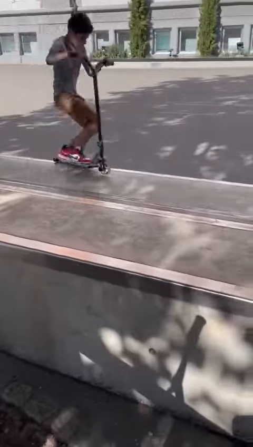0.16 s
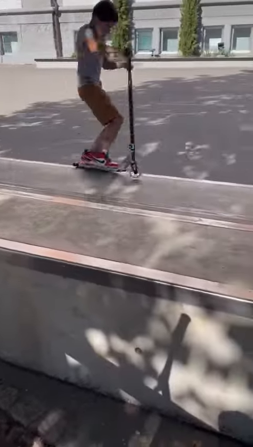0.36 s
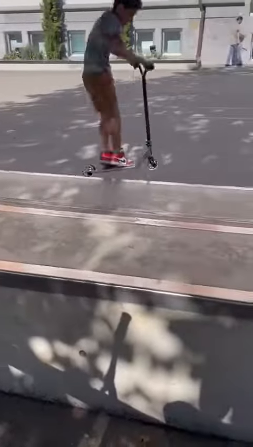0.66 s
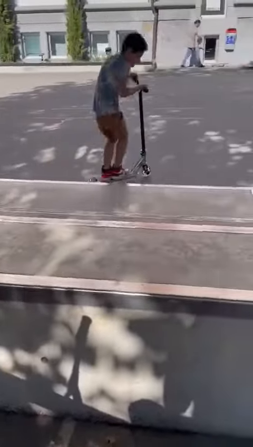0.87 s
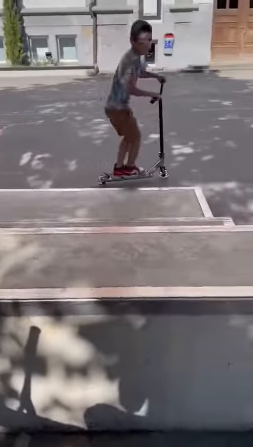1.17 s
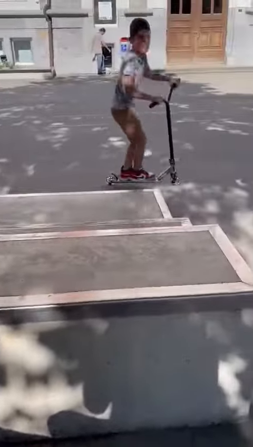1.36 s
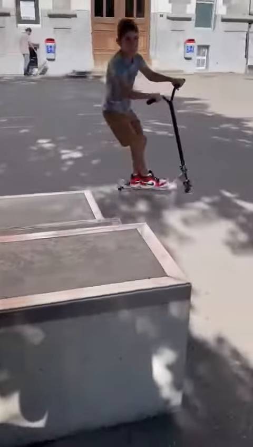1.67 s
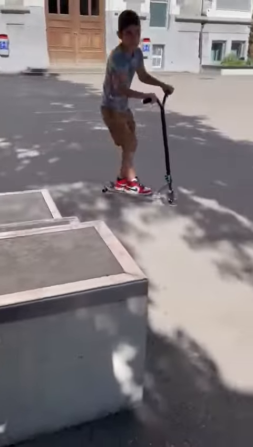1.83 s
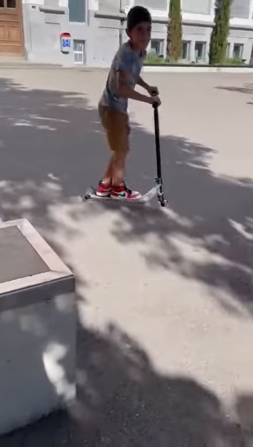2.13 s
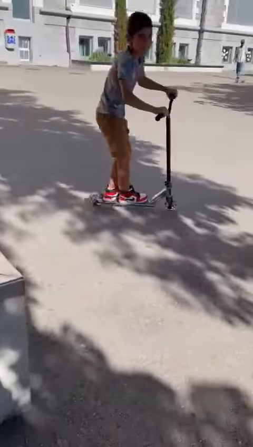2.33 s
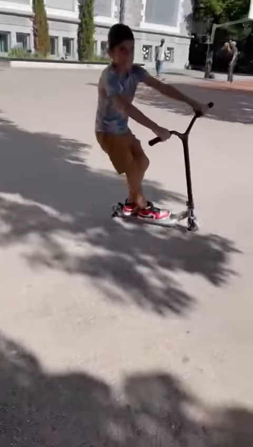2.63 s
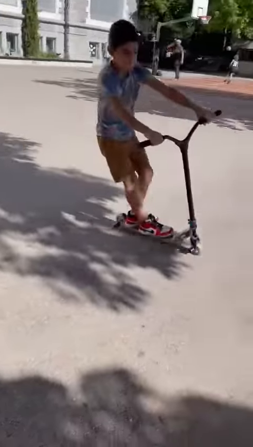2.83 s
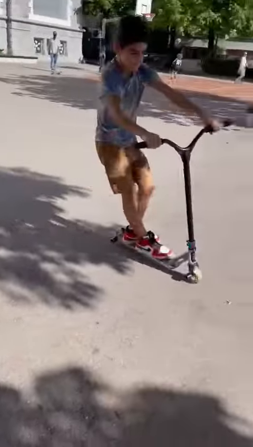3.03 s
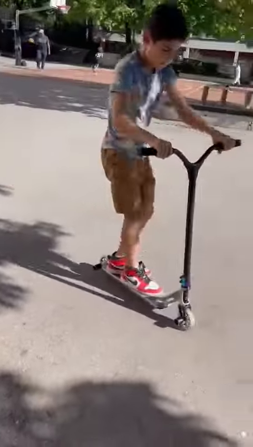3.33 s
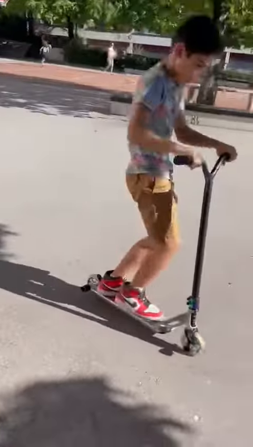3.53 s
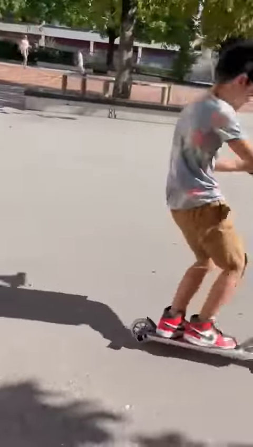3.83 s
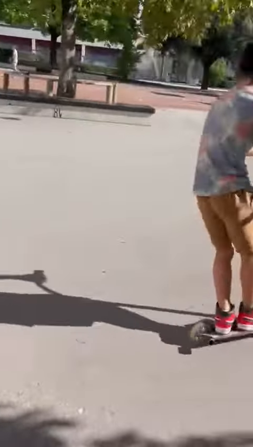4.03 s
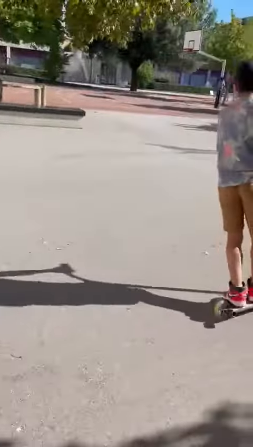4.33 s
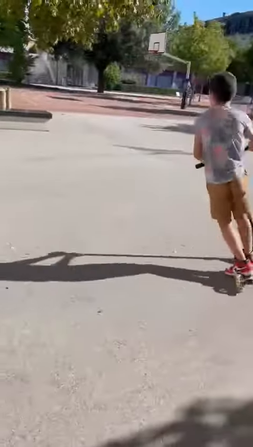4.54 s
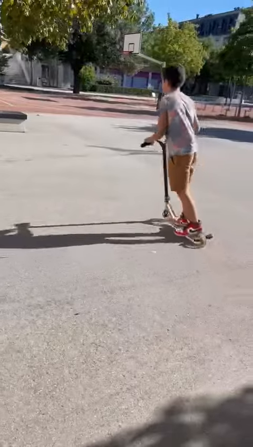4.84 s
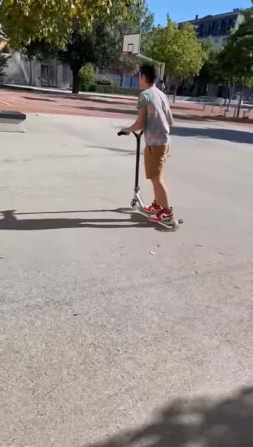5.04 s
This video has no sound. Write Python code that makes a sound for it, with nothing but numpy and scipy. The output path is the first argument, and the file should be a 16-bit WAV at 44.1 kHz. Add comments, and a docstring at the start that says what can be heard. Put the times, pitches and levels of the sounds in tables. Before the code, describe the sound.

A stunt scooter hits a ledge with a sharp metal clack and grinds along it with a brief squeal. It lands, then drops to the concrete with a rattle. The hard wheels rumble and hum from far right to close left, where the scooter slams down loudly and rolls on. Dull footsteps, scuffs and cracking grit sound beside the microphone in an open yard.

```python
"""A sharp metal clack: a stunt scooter hits a skatepark ledge and grinds along it with a short squeal.
It lands, drops to the concrete, rolls from far right to close left and slams down once more.
Deck and stem ring at every blow, and a facade answers while the scooter is far off. The hard wheels
rumble and hum. Someone walks beside the listener: dull heel-and-toe footfalls, scuffing soles and
grit that cracks underfoot."""
import sys
import numpy as np
from scipy import signal
from scipy.fft import rfft, irfft, next_fast_len
from scipy.io import wavfile
from scipy.ndimage import uniform_filter1d, map_coordinates

SR = 44100
rng = np.random.default_rng(int(sys.argv[2]) if len(sys.argv) > 2 else 0)


def output_pcm(signal):
    """Save a mono or channel-first signal as 16-bit PCM at the path in sys.argv[1].

    Samples are clipped to [-1, 1] before scaling.
    """
    pcm = np.clip(np.atleast_2d(signal).T, -1, 1) * 32767
    wavfile.write(sys.argv[1], SR, np.round(pcm).astype(np.int16))


N = 229128
TIME = np.arange(N) / SR
SIDES = np.array([[.5], [-.5]])  # splits a level or phase offset between left and right


def amp(db):
    """Decibels to gain."""
    return 10 ** (np.asarray(db) / 20)


def unit(x):
    """Scale to rms 1."""
    return x / np.sqrt(np.mean(x ** 2) + 1e-20)


def along(points, hz):
    """Read a curve of (Hz, value) points on a log frequency axis."""
    freqs, values = np.transpose(points)
    return np.interp(np.log(hz + 1), np.log(freqs + 1), values)


def curves(rows):
    """Automation lanes: one value per sample for each column after the time."""
    times, *columns = np.transpose(rows)
    return [np.interp(TIME, times, column) for column in columns]


def wobble(rate):
    """A smooth random curve, rate knots a second."""
    knots = rng.standard_normal(int(N * rate / SR) + 4)
    grid = np.arange(0, len(knots) - 1, 1 / 10)
    return np.interp(TIME * rate, grid, map_coordinates(knots, [grid]))


def swell(peak_s, rise_s, fall_s):
    """An envelope that grows exponentially to its peak and dies away after it."""
    return np.exp(np.minimum((TIME - peak_s) / rise_s, (peak_s - TIME) / fall_s))


def filtered(x, response):
    """EQ x with a complex response of frequency."""
    n = x.shape[-1]
    padded = next_fast_len(n + SR // 4)
    return irfft(rfft(x, padded) * response(np.fft.rfftfreq(padded, 1 / SR)), padded)[..., :n]


def noise(spectrum, shape):
    """Coloured noise of rms 1."""
    return unit(filtered(rng.standard_normal(shape), lambda hz: amp(along(spectrum, hz))))


def fading(spectrum, t, t60):
    """A dying burst of coloured noise, with the energy of its envelope."""
    envelope = amp(-60 * t / t60)
    burst = noise(spectrum, len(t)) * envelope
    return burst * np.linalg.norm(envelope) / np.linalg.norm(burst)


def fuzzy_tone(hz, width):
    """A narrow band of noise, rms 1, that follows a pitch curve."""
    phase = 2 * np.pi * np.cumsum(hz) / SR
    return unit(wobble(width) * np.sin(phase) + wobble(width) * np.cos(phase))


def add(track, start_s, x):
    """Mix x into the track from start_s on."""
    i = max(round(start_s * SR), 0)
    track[..., i:i + x.shape[-1]] += x[..., :N - i]


def ring(modes, t, damping):
    """Damped modes, struck at new strengths every time; damping multiplies their widths."""
    hz, width, db = np.transpose(modes)[:, :, None]
    strength = amp(db + rng.normal(0, 0.73, hz.shape))
    decay = np.exp(-np.pi * width * damping * t)
    waves = np.sin(2 * np.pi * (hz * t + rng.random(hz.shape)))
    return (strength * decay * waves).sum(0) / np.linalg.norm(strength)


def focused(modes, centre_hz, loss_db):
    """The struck spot favours modes near centre_hz; those an octave away lose loss_db."""
    return [(hz, width, db - loss_db * np.log2(hz / centre_hz) ** 2) for hz, width, db in modes]


# Modes of the deck's hollow body, of its clack and of the stem.
# Each row: frequency in Hz, base width in Hz, relative level in dB.
BOOM_MODES = [(198, 20, 1.5), (277.2, 15, 6), (340, 25, -2.5), (397, 28, -3), (461, 24, -0.5),
              (507, 35, -4), (543, 19, -3), (591, 20, 2), (631, 19.6, 0.5), (693, 20.6, 3.5)]
CLACK_MODES = [(822, 27, 3.5), (917, 30, 0), (1016, 35, 0), (1068, 34, -2), (1097, 24, 0.5),
               (1166, 24, 1.5), (1220, 27, 0), (1300, 20, 1), (1335, 32, -1.5), (1422, 27, 0),
               (1507, 23, 0.5), (1643, 27, 0)]
STEM_MODES = [(1735, 25, 0), (1935, 21, 1.5), (2226, 28, 5), (2320, 22, 11), (2384, 29, 2.5),
              (2640, 29, -8), (2660, 32, 4), (2910, 29, -4.5), (3010, 35, 1), (3310, 41, 3),
              (3620, 49, -11), (5000, 53, -18), (6830, 23, -3)]
# Noise colours of the low knock, the mid clack (also heel taps and slaps) and the bright crack.
# Each row: frequency in Hz, relative level in dB.
KNOCK_EQ = [(45, -13), (75, 1), (130, -9.5), (270, -3.5), (380, -12.5), (700, -65), (2000, -77)]
CLACK_EQ = [(120, -45), (400, 5), (620, 2), (820, 2.5), (1170, 5.5), (1500, -1), (2000, 0.5), (3000, -16.5),
            (5000, -17), (12000, -21)]
CRACK_EQ = [(600, -52), (1800, 4), (3100, 0.5), (4300, 0), (6500, -4), (8000, 0), (11000, -2.5)]
# The scooter's hits, plus a faint bright tick at 0.102 s echoing off the facade.
# Each row: start in seconds, level in dB, knock and boom trims in dB,
# boom and clack centres in Hz, stem and crack trims in dB, ring length as a factor.
BLOW_CUES = [(0.0, -12.5, -11.5, -14, 520, 1170, -15, -12, 0.53),
             (0.0155, -10.5, -21, -15.5, 502, 1210, -6, 1, 0.52),
             (0.102, -39, -24, -22, 500, 1200, -4, 7, .9), (0.324, -28, 1, -2.5, 271, 1010, -12, -20, 1.8),
             (0.463, -25.5, -17, -22, 496, 965, -2, -15, 0.55),
             (0.4806, -18.5, -11, -18, 700, 960, -4.5, -23, 0.42),
             (0.497, -21, -14, -24, 700, 920, -16, -35, 1.7), (0.742, -29, -4, -6, 400, 1100, -7, -5, 1.2),
             (0.751, -15, -9, -9, 750, 1090, -1.5, -7.5, 0.66),
             (0.754, -22.5, -4, 4.5, 374, 1000, -12, -12, 0.43),
             (0.7617, -17.5, -3.5, -10, 600, 1210, -2.5, -5.5, 0.68),
             (1.692, -21.5, -21, -5, 292, 910, -10, -11.5, 0.87),
             (1.704, -23.5, -24, -7, 525, 957, -16.5, -12.5, 1.46),
             (1.8458, -23, -13, -1, 287, 880, -15, -17, 1.15),
             (1.856, -25.5, -8, -0.5, 317, 890, -22, -22, 1),
             (1.861, -30.5, -23, -3, 610, 950, -20, -20, 1.3),
             (1.931, -23.5, -8.5, -4, 650, 970, -20, -21, 0.76),
             (2.011, -26, -4.5, -3.5, 550, 1090, -8, -14, 0.67),
             (2.022, -29.5, -9, -6, 400, 1150, -9, -19, 0.9),
             (3.6102, -23.5, -23, -23, 600, 1248, -7, -4.5, .3),
             (3.6123, -11.5, -34, -12.5, 560, 1140, -25, -18, 0.92),
             (3.623, -10, -30, -10, 290, 1220, -17, -16, 0.87),
             (3.634, -8, -28, -13, 280, 1230, -16.5, -14.5, 0.83),
             (3.646, -16, -25, -5.5, 480, 1190, -26, -16, 1.3),
             (3.675, -22, -12, 3, 590, 1140, -23, -11, 0.93),
             (3.843, -26.5, -8, -10, 400, 1250, -16, -26, 2.5),
             (3.95, -25, -18, -23, 499, 1530, -15.5, -13.5, 1.07),
             (4.12, -28, -14, 1, 651, 993, -29, -30, 0.56), (4.686, -32, 4, 3, 300, 1330, -8, -9, 0.91)]


def blows():
    """Each cue layers a knock, the struck spot's boom and clack, a stem ring and a crack."""
    track, t = np.zeros(N), np.arange(SR // 4) / SR
    # the heavy deck takes longer to get moving than the thin stem
    slow_attack, fast_attack = 1 - np.exp(-t / .0018), 1 - np.exp(-t / .0005)
    for start, db, knock_db, boom_db, boom_hz, clack_hz, stem_db, crack_db, length in BLOW_CUES:
        rattle_t60 = 0.083 * length  # loose parts buzz on after the contact
        boom = ring(focused(BOOM_MODES, boom_hz, loss_db=10.5), t, damping=1 / length)
        knock = fading(KNOCK_EQ, t, t60=0.094)
        rattle = amp(-5.5) * fading(CLACK_EQ, t, rattle_t60)
        clack = amp(1.5) * ring(focused(CLACK_MODES, clack_hz, loss_db=42), t, damping=1.06 / length)
        stem = ring(STEM_MODES, t, damping=1.33 / length)
        sizzle = amp(-2) * fading(CRACK_EQ, t, rattle_t60) * fast_attack
        contact = amp(2.5) * fading(CRACK_EQ, t, t60=.008)
        body = (amp(knock_db) * knock + amp(boom_db) * boom) * slow_attack
        metal = (amp(-10.5) * (rattle + clack) + amp(stem_db) * stem) * fast_attack
        crack = amp(crack_db) * (sizzle + contact)
        add(track, start, amp(db) * (body + metal + crack))
    return track


# Colour of grit rubbed on concrete, under deck, wheel or shoe.
# Each row: frequency in Hz, relative level in dB.
GRIT_EQ = [(100, 1), (600, 2.5), (1400, 0.5), (2500, -6.5), (4000, -6), (6500, -8.5), (9000, -2),
           (11000, -8)]


def grains(per_s, range_db):
    """Grit ticks at random times and strengths, rms 1 overall."""
    track, t = np.zeros(N), np.arange(SR // 40) / SR
    draws = rng.random((int(per_s * N / SR), 2))
    ticks = noise(GRIT_EQ, len(draws) * len(t)).reshape(-1, len(t)) * amp(-60 * t / 0.015)
    for (when, size), tick in zip(draws, ticks):
        add(track, when * TIME[-1], amp(range_db * size) * tick)
    return unit(track)


# Colours of the ledge's scrape and of concrete hiss (also under the wheels).
# Each row: frequency in Hz, relative level in dB.
SCRAPE_EQ = [(180, -35), (500, -21), (800, 2.5), (1400, -2.5), (2200, 0), (3300, 0), (4500, -9), (6500, -5),
             (8000, -20), (11000, -6.5)]
HISS_EQ = [(1500, -6.5), (3000, 4.5), (4200, 0.5), (6500, -3.5), (8000, -7.5), (11000, -9.5)]
# The slide along the ledge. Each row: time in seconds, level in dB, pitch of the singing edge in Hz.
GRIND_CURVE = [(0, -25, 2290), (.06, -46, 2200), (.13, -43, 1980), (.2, -44, 2250), (.28, -41.5, 2550),
               (.33, -45, 2850), (.45, -42.5, 2300), (.5, -40, 2157), (.56, -54, 1923), (.72, -63, 1924)]


def grind():
    """The deck judders over the rough ledge and chips grit off it, while the edge sings."""
    db, hz = curves(GRIND_CURVE)
    chips = amp(-3.5) * grains(per_s=220, range_db=14)
    scrape = noise(SCRAPE_EQ, N)
    edge = amp(-3.5) * fuzzy_tone(hz, width=240)
    hiss = amp(1.5) * noise(HISS_EQ, N)
    judder = amp(2.5 * wobble(250) + 1.2 * wobble(45))
    on_ledge = TIME < 0.69
    return on_ledge * amp(db) * unit((scrape + edge + hiss + chips) * judder)


# The fader that drives wheel noise and sand. Each row: time in seconds, level in dB.
ROLL_CURVE = [(0.7, -50.5), (1.02, -52.5), (1.37, -53), (1.94, -46), (2.13, -49), (2.4, -52), (2.8, -46),
              (3.45, -53), (3.65, -48.5), (3.78, -40.5), (3.94, -42), (4.15, -45), (4.97, -45), (5.2, -44)]


def roll_level():
    """How loudly the wheels run, in dB; they barely touch at first."""
    db, = curves(ROLL_CURVE)
    lifted_db, wheels_down_s = -18, 0.3
    return db + lifted_db * np.clip(2 * (1 - TIME / wheels_down_s), 0, 1)


def patchy(x, depth_db):
    """Narrow bands of x swell and fade on their own."""
    bands = signal.stft(x, nperseg=1024)[2]
    drift = uniform_filter1d(rng.standard_normal(bands.shape[1:]), size=3, axis=0)  # across pitch
    drift = uniform_filter1d(drift, size=11, axis=1)  # across time
    return unit(signal.istft(bands * amp(depth_db * unit(drift)), nperseg=1024)[1][:, :N])


# Colours of the wheels' low rumble and mid roar. Each row: frequency in Hz, relative level in dB.
RUMBLE_EQ = [(20, -28), (35, -8), (58, 4.5), (100, -0.5), (145, 1.5), (220, -6), (350, -13.5), (700, -56)]
ROAR_EQ = [(150, -13.5), (350, 7), (620, 0.5), (900, -3), (1400, -7.5), (2300, -9), (3300, -22.5),
           (6000, -58)]


def rolling():
    """Hard wheels on concrete: bumps swell rumble and roar, the surface grain roughens roar and hiss."""
    db = roll_level()
    push_db = db + 47.5  # level above an easy roll
    bumps_db, grain_db, swells_db = 2 * wobble(28), wobble(400), .9 * wobble(8)
    rumble = amp(-43 + 0.43 * push_db + bumps_db) * noise(RUMBLE_EQ, (2, N))
    roar = patchy(noise(ROAR_EQ, (2, N)), depth_db=3.5)
    roar *= amp(db + 0.5 + .5 * bumps_db + 0.7 * grain_db)
    hiss = amp(-51.5 + 0.5 * push_db + swells_db + grain_db) * noise(HISS_EQ, (2, N))
    return rumble + roar + hiss


def sand():
    """Loose grains tick as the wheels crush them."""
    return amp(roll_level() - 11) * grains(per_s=45, range_db=8)


# The wheels' hollow note. Each row: time in seconds, pitch in Hz, level in dB before the trim.
HUM_CURVE = [(0.7, 644, -60), (1.3, 636, -59), (1.46, 675, -55), (1.6, 742, -48.5), (1.7, 709, -53),
             (1.9, 666.3, -62), (2.2, 594, -62), (2.62, 670, -53.5), (2.8, 699, -46.5), (3.52, 586, -67),
             (3.75, 606, -50), (4.04, 581, -48.5), (4.11, 610, -35), (4.21, 618, -49), (4.89, 609, -59),
             (5.2, 598, -47)]


def wheel_hum():
    """The turning wheels hum with a hollow, unsteady note."""
    hz, db = curves(HUM_CURVE)
    gain = amp(db - 1 + 1.5 * wobble(9))
    return gain * np.array([fuzzy_tone(hz, width=150), fuzzy_tone(hz, width=150)])


def squeal():
    """Metal sticks and slips on the ledge: a rough tone and a low groan catch, hold and die away."""
    start_s, attack_s, hold_s, fall_db_per_s, pitch_hz = 0.321, 0.0024, 0.013, 703, 3375
    t = TIME - start_s
    envelope = np.clip(t / attack_s, 0, 1) * amp(-fall_db_per_s * np.maximum(t - hold_s, 0))
    phase = 2 * np.pi * np.cumsum(pitch_hz * (1 + .024 * wobble(800))) / SR
    tone = np.sin(phase) + amp(-8) * np.sin(2 * phase) + amp(-20) * np.sin(3 * phase)
    rough_gain = amp(-20 + 1.9 * wobble(303.3))
    groan = amp(-18.5) * fuzzy_tone(np.full(N, 920.), width=260)
    return envelope * rough_gain * (tone + groan)


# Colour of a footfall's dull body. Each row: frequency in Hz, relative level in dB.
THUD_EQ = [(50, -3), (130, 1), (400, 1.5), (600, -27), (1500, -49)]


def thud(base_hz, swell_s):
    """A thud swells and sinks in pitch as the sole flattens, with a soft slap on top."""
    t = np.arange(SR // 6) / SR
    progress = t / swell_s
    pitch = base_hz * (0.6 + 1.993 * np.exp(-progress / 0.67))
    pressure = (progress * np.exp(1 - progress)) ** 2.63
    push = pressure * np.sin(2 * np.pi * np.cumsum(pitch) / SR)
    body = amp(-10) * noise(THUD_EQ, len(t)) * amp(-60 * t / .11) * (1 - np.exp(-progress))
    slap = amp(-25) * noise(CLACK_EQ, len(t)) * amp(-60 * t / 0.14) * (1 - np.exp(-10 * progress))
    return push + body + slap


# The walker's steps. Each row: start in seconds, heel level in dB, base pitch in Hz, heel swell and
# forefoot lag in seconds, forefoot and tap levels in dB relative to the heel.
STEP_CUES = [(0.484, -15.5, 166, .0078, 0.022, -7.5, -20), (0.627, -24.5, 134, .01, 0.043, -13.5, -32),
             (1.895, -19.5, 143, 0.009, .034, -8.5, -17), (2.521, -17.5, 126, 0.012, .035, -2.5, -18),
             (3.088, -16, 148.7, 0.0081, .031, -9.5, -32), (3.817, -21, 127, 0.0087, .036, -0.5, -13),
             (4.075, -15, 158.6, 0.0079, .043, -18, -19), (4.691, -19.5, 170, 0.0067, .032, -4, -16),
             (5.092, -19, 150, 0.0073, .04, -24, -22)]


def footfalls():
    """The heel lands, its edge taps just after, and the forefoot follows with a lower thud."""
    track, t = np.zeros(N), np.arange(SR // 20) / SR
    for start, db, hz, swell_s, lag_s, toe_db, tap_db in STEP_CUES:
        add(track, start, amp(db) * thud(hz, swell_s))
        add(track, start + .0015, amp(db + tap_db) * fading(CLACK_EQ, t, t60=0.012))
        add(track, start + lag_s, amp(db + toe_db) * thud(hz * 0.748, swell_s=0.011))
    return track


# Colour of a grain snapping. Each row: frequency in Hz, relative level in dB.
SNAP_EQ = [(800, -22), (4000, -8), (7000, 0), (10000, 6), (11500, -0.5)]
# Grit underfoot. Each row: start in seconds, snap level in dB, crunch level in dB.
GRIT_CUES = [(1.8633, -25.5, -36.5), (2.6702, -22.5, -30), (2.7129, -24, -34.5), (3.9498, -30, -43),
             (4.377, -47, -37.5), (4.947, -25.5, -27), (5.0992, -30.5, -37)]


def grit_cracks():
    """Single grains crack under a sole: a sharp snap and a duller, longer crunch."""
    track, t = np.zeros(N), np.arange(SR // 8) / SR
    for start, snap_db, crunch_db in GRIT_CUES:
        crunch = fading(GRIT_EQ, t, t60=0.027) + amp(-11.5) * fading(GRIT_EQ, t, t60=0.2)
        snap = fading(SNAP_EQ, t, t60=.008)
        add(track, start, amp(snap_db) * snap + amp(crunch_db) * crunch)
    return track


# Dragging soles. Each row: peak time in seconds, level in dB, rise and fall in seconds.
SCUFF_CUES = [(1.996, -34, 0.021, 0.043), (2.121, -40.5, 0.0055, 0.016), (2.74, -38, 0.037, 0.059),
              (3.85, -43, 0.017, .03), (4.06, -36.5, 0.0091, 0.024), (4.952, -38, 0.0046, 0.051)]


def scuffs():
    """Shoes drag over the concrete in short, grainy swells."""
    drag = sum(amp(db) * swell(peak, rise, fall) for peak, db, rise, fall in SCUFF_CUES)
    return drag * unit(noise(GRIT_EQ, N) * amp(2.8 * wobble(900)))


# Modes of the thin steel fender. Each row: frequency in Hz, base width in Hz, relative level in dB.
FENDER_MODES = [(3220, 35, -2.5), (3600, 32, -6), (4060, 40, -1), (4550, 38, -3), (5350, 40, -2),
                (5860, 31, -1), (6840, 94, 3), (7800, 71, 9), (10100, 130, 6), (10900, 90, 2)]


def fender_buzz():
    """After the drop the brake fender chatters against the wheel and keeps ringing."""
    t = np.arange(SR // 5) / SR
    envelope = swell(peak_s=1.992, rise_s=0.018, fall_s=.028)
    taps = envelope * rng.standard_normal(N) * amp(5 * wobble(300))
    buzz = signal.oaconvolve(taps, ring(FENDER_MODES, t, damping=1.35))[:N]
    return amp(-35.5) * buzz * np.linalg.norm(envelope) / np.linalg.norm(buzz)


def placed(x, pan_db):
    """Pan x, mainly around 1 kHz; positive is left."""
    return filtered(x, lambda hz: amp(SIDES * pan_db * np.exp(-np.log2((hz + 1) / 1050) ** 2)))


def reflected(x, response):
    """Send x through a two-channel impulse response scaled to energy 1 in its first channel."""
    return signal.oaconvolve(x[None], response / np.linalg.norm(response[0]), axes=1)[:, :N]


def bounce(x, delay_s, t60):
    """A surface scatters x back as two unrelated signals."""
    t = np.arange(SR // 4) / SR
    envelope = (t >= delay_s) * amp(-60 * np.abs(t - delay_s) / t60)
    return reflected(x, rng.standard_normal((2, len(t))) * envelope)


# Tone of the facade's echo. Each row: frequency in Hz, gain in dB.
FACADE_EQ = [(300, -21), (1000, -14.5), (2300, -23), (5000, -18.5), (11000, -34)]


def facade_echo(x):
    """The facade throws back a late, coloured slap."""
    return filtered(bounce(x, delay_s=.084, t60=0.047), lambda hz: amp(along(FACADE_EQ, hz)))


# The yard's reverb. Each row: frequency in Hz, time to fall 60 dB in seconds.
YARD_DECAY = [(100, 0.41), (400, 0.52), (1300, 0.69), (4000, 0.43), (11000, 0.38)]


def yard_tail(x):
    """The thin tail of the open yard; each frequency dies at its own speed."""
    hz, t, bands = signal.stft(rng.standard_normal((2, SR * 3 // 4)), SR, nperseg=256)
    decay = amp(-60 * t / along(YARD_DECAY, hz)[:, None])
    return reflected(x, signal.istft(bands * decay, SR, nperseg=256)[1])


# How alike left and right are in diffuse sound. Each row: frequency in Hz, coherence (1 is mono).
COHERENCE = [(130, 1), (300, 0.99), (600, 0.21), (1000, 0.13), (1800, 0.83), (3000, 0.052), (4200, 0.05),
             (4900, 0.97), (6100, 1), (7400, 1), (8600, 1), (9600, 1), (11000, 1)]


def diffuse(pair):
    """Two unrelated signals become a stereo field that is mono in the bass and the high treble."""
    def mid_side_gains(hz):
        angle = np.arccos(np.clip(along(COHERENCE, hz), -1, 1)) / 2
        return np.array([np.cos(angle), np.sin(angle)])
    mid, side = filtered(pair, mid_side_gains)
    return np.array([mid + side, mid - side])


def scene():
    """The scooter starts to the right, where the facade echoes it, then passes close on the left."""
    scooter = blows() + fender_buzz() + grind() + sand()
    shriek = squeal()
    feet = footfalls() + scuffs() + grit_cracks()
    passed = np.interp(TIME, (2.2, 3.0), [0, 1])  # crossfade from far right to near left
    far, near = scooter * (1 - passed), scooter * passed
    direct = placed(far + shriek, pan_db=-7.5) + placed(near, pan_db=13) + placed(feet, pan_db=6)
    ground = amp(-5) * bounce(scooter, delay_s=0.00082, t60=0.027)
    echo = facade_echo(far)
    reverb_send = amp(-8.5) * far + near + amp(-11) * shriek + amp(-1.5) * feet
    tail = amp(-4.5) * yard_tail(reverb_send)
    return direct + diffuse(ground + echo + tail + rolling() + wheel_hum())


# Phase between the microphone's two ports. Each row: frequency in Hz, lead of the left in radians.
PORT_PHASE = [(2500, 0), (4200, 1.4), (4950, 3.14), (5400, 6), (6500, 6.4), (7400, 7.9), (8300, 9.3),
              (9500, 9.55), (10500, 10.7), (11400, 12.5)]
# The microphone's treble colour. Each row: frequency in Hz, gain in dB.
MIC_EQ = [(6600, 0), (8200, -1.5), (10200, 1), (11200, -1)]


def record(dry):
    """The microphone's ports go in and out of phase across the treble; deep bass and the top are cut."""
    def response(hz):
        ports = np.exp(1j * SIDES * along(PORT_PHASE, hz))
        low_cut = (1j * hz / (1j * hz + 28)) ** 2
        high_cut = (hz < 12000) / np.sqrt(1 + (hz / 11150) ** 80)
        return ports * amp(along(MIC_EQ, hz)) * low_cut * high_cut
    return filtered(dry, response)


dry = scene()
out = record(dry)
output_pcm(out)
```